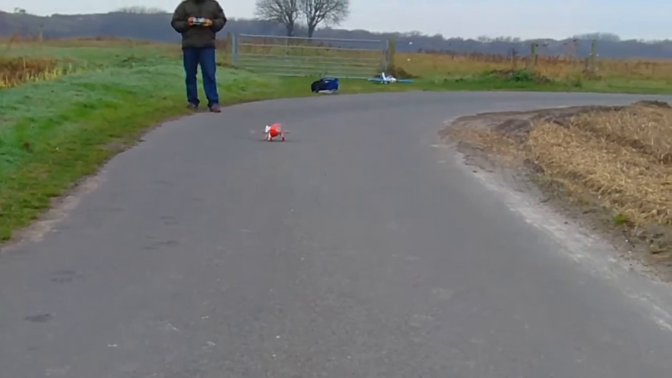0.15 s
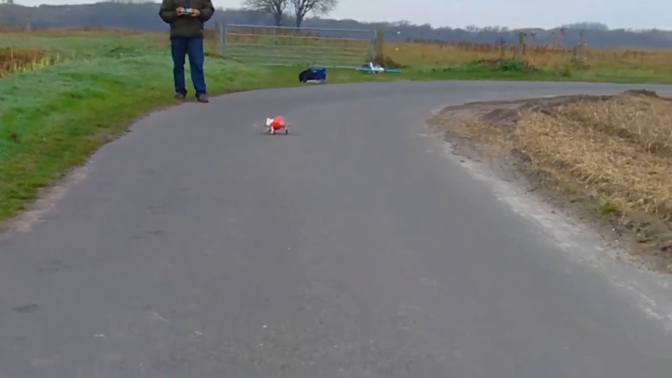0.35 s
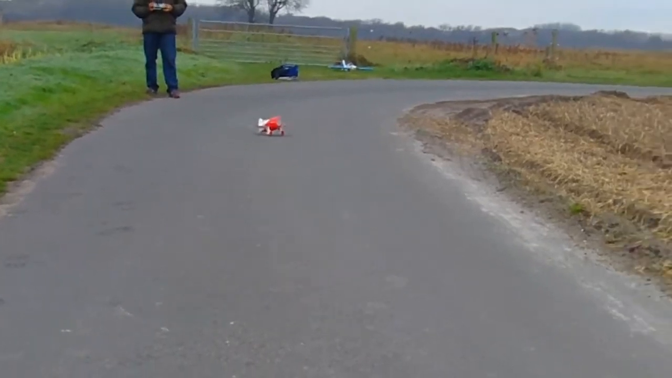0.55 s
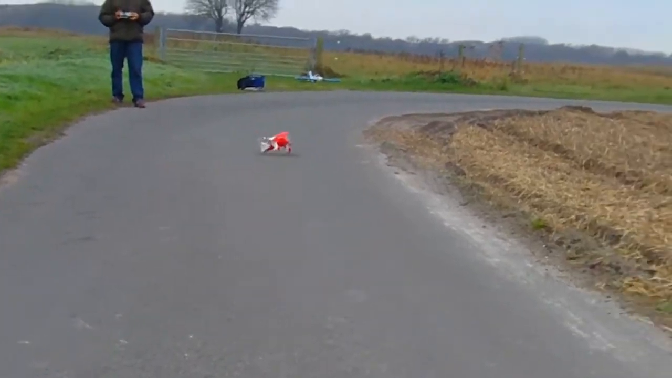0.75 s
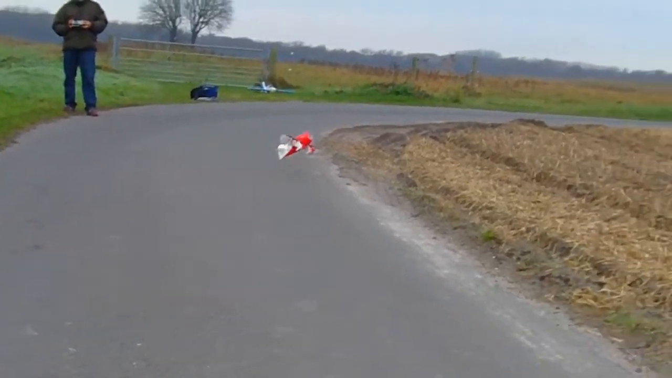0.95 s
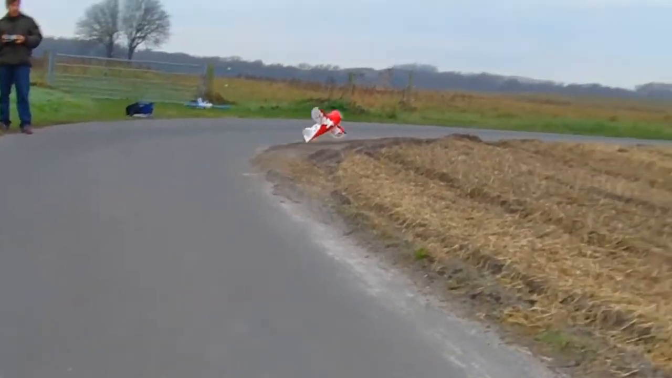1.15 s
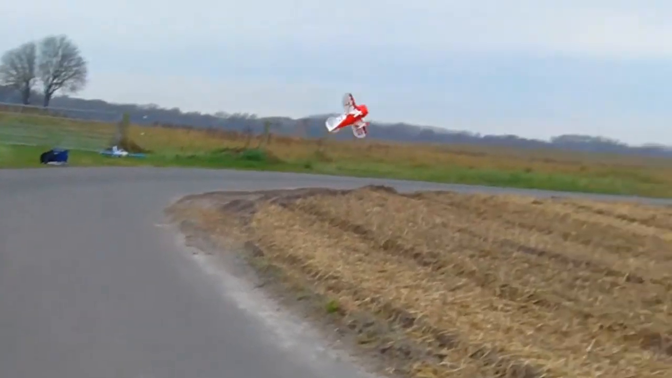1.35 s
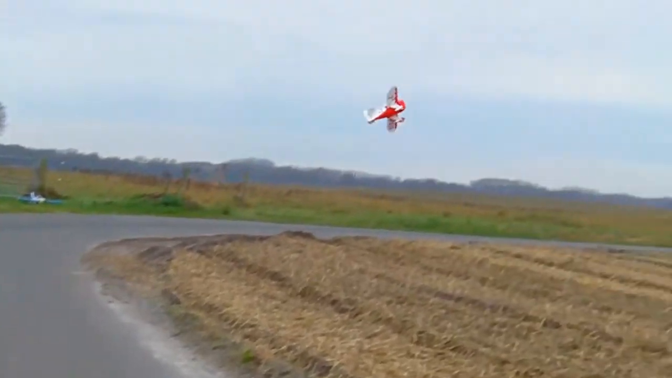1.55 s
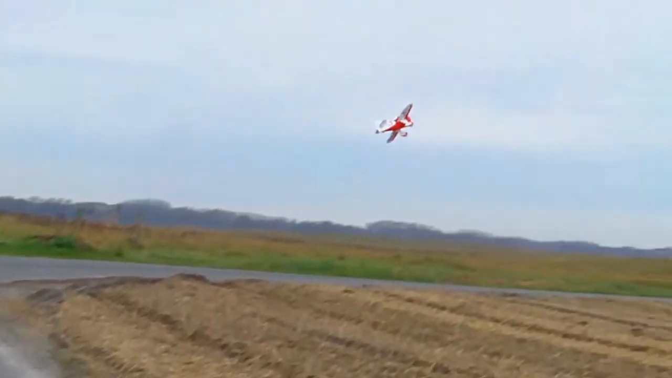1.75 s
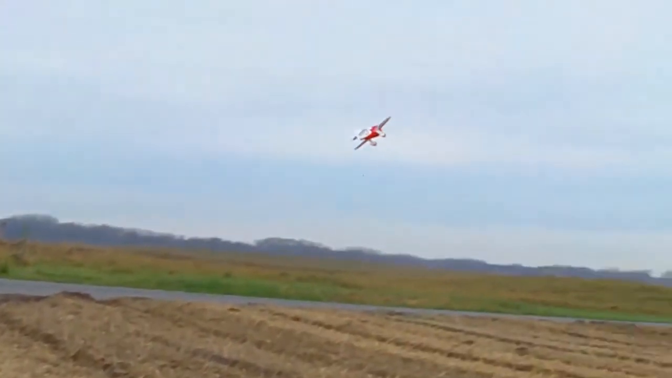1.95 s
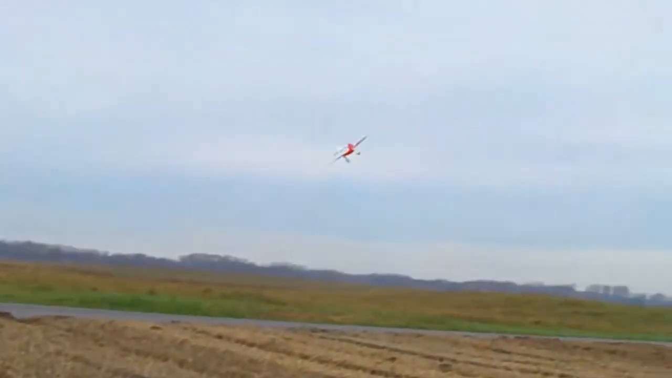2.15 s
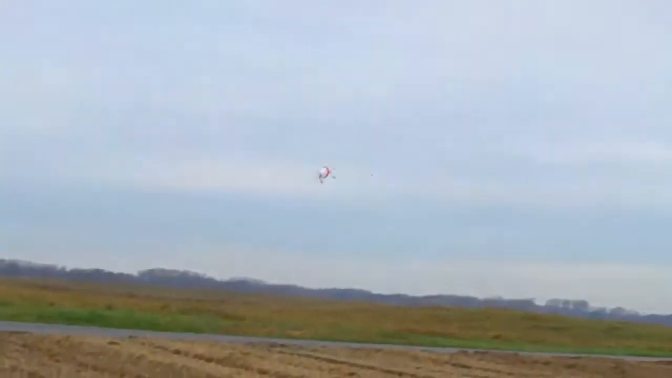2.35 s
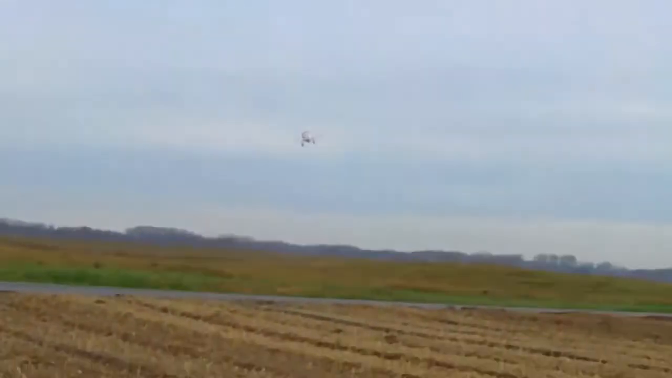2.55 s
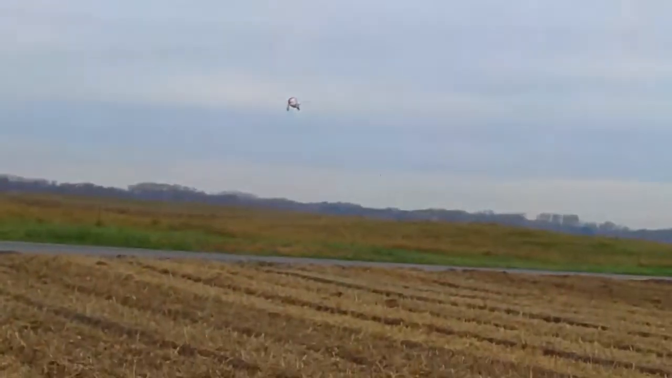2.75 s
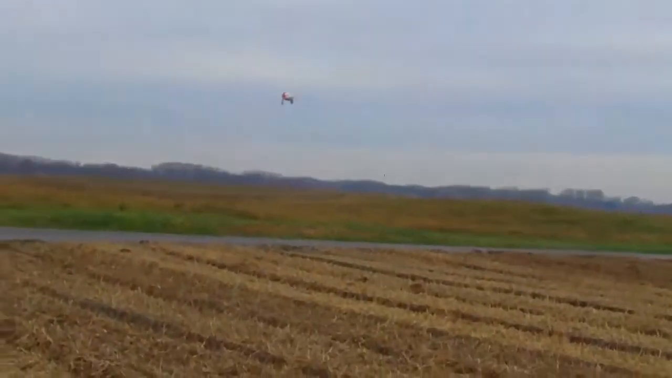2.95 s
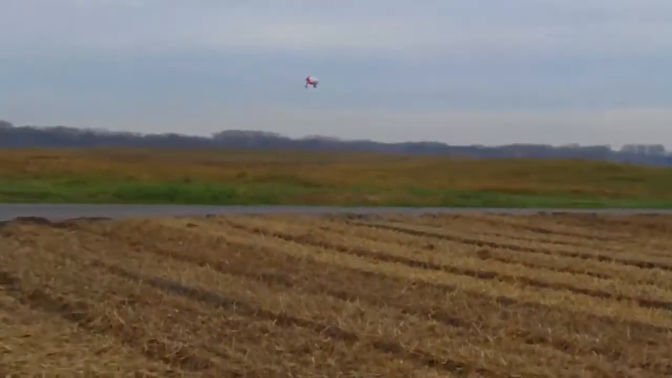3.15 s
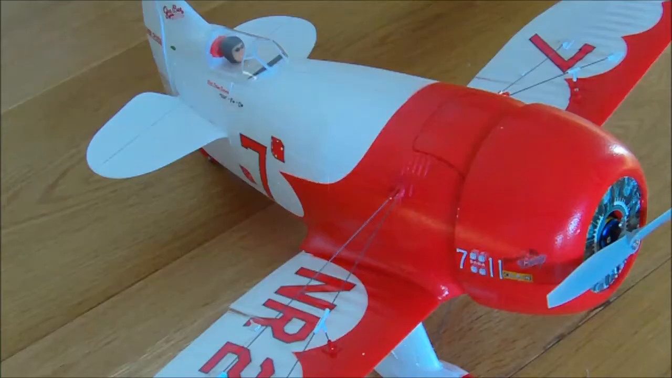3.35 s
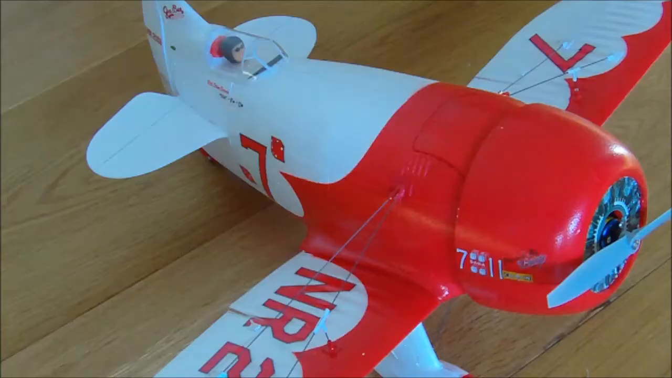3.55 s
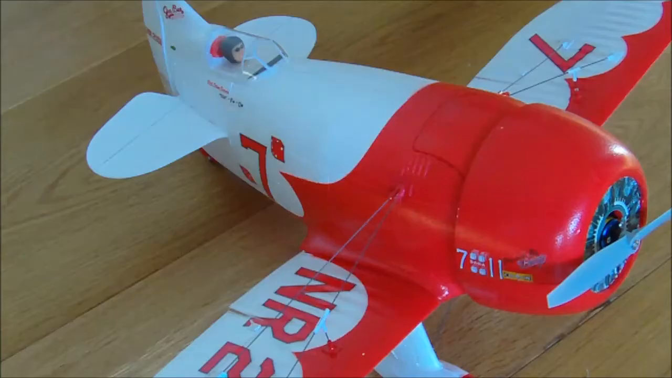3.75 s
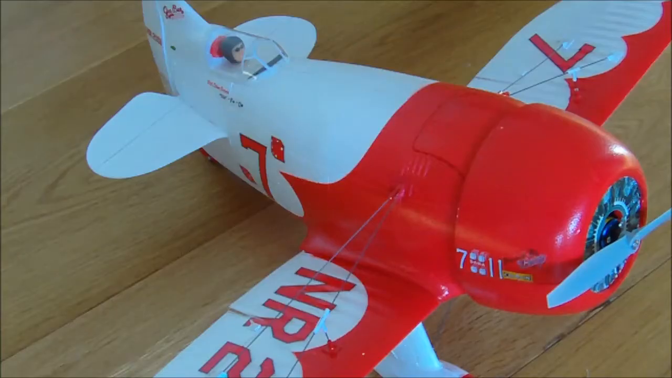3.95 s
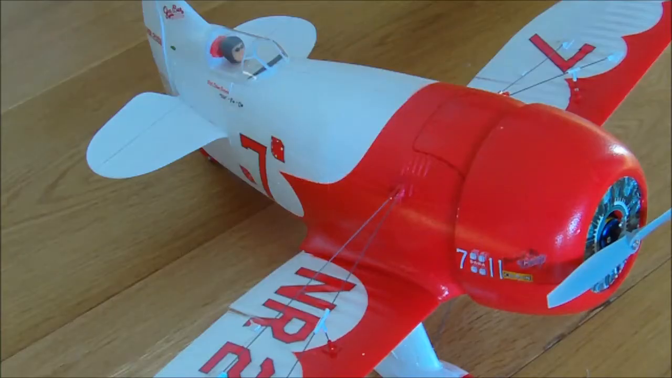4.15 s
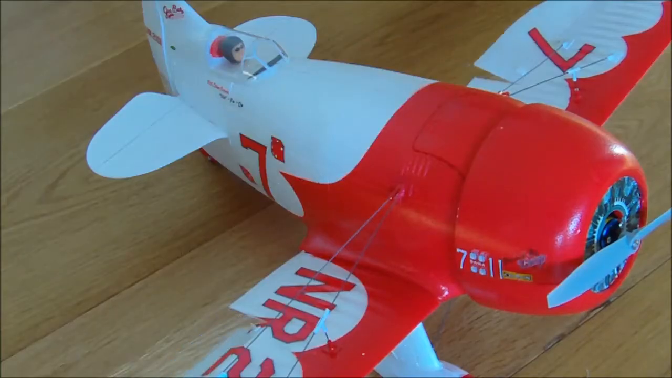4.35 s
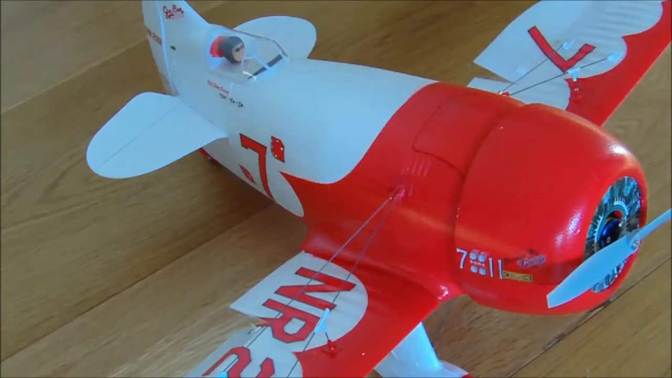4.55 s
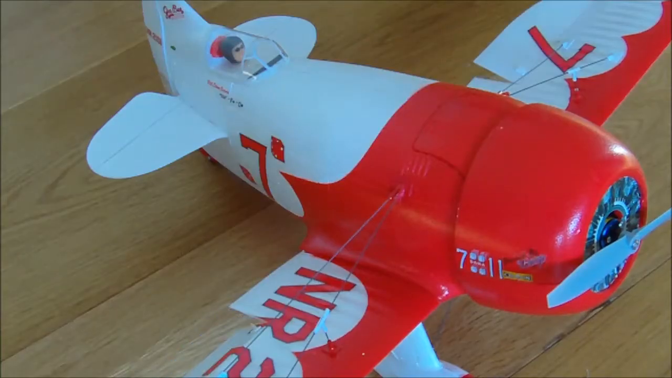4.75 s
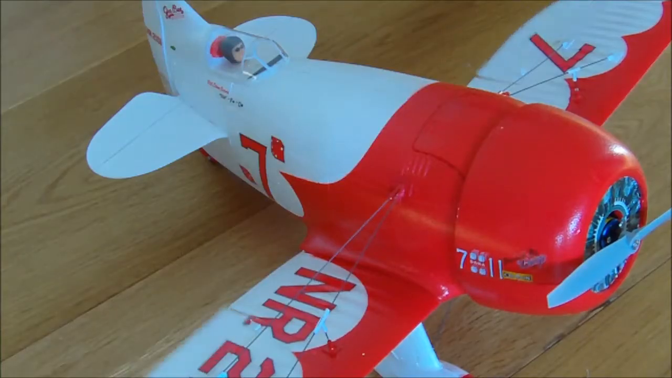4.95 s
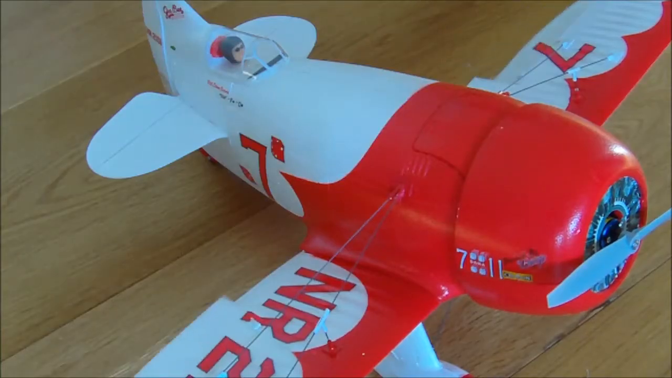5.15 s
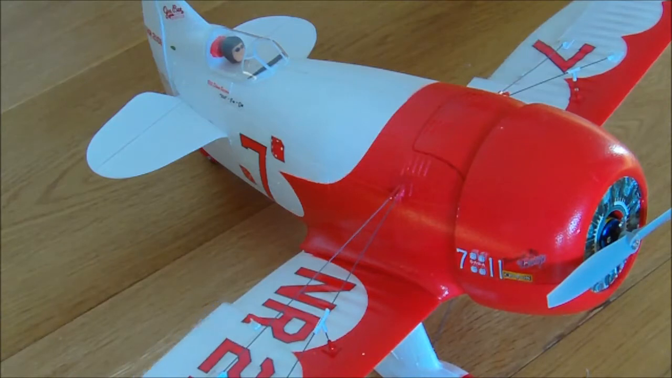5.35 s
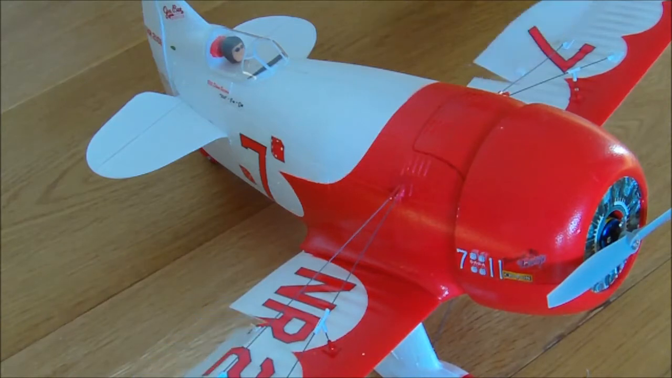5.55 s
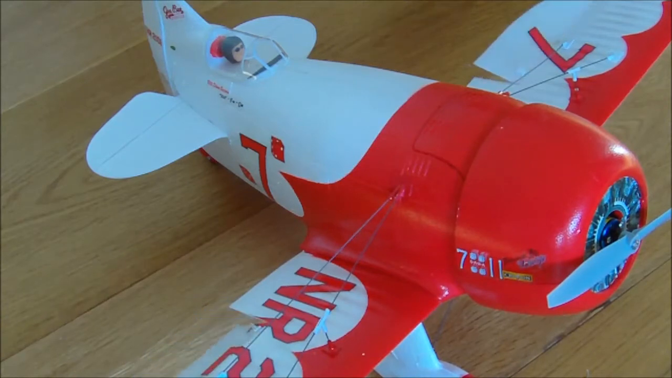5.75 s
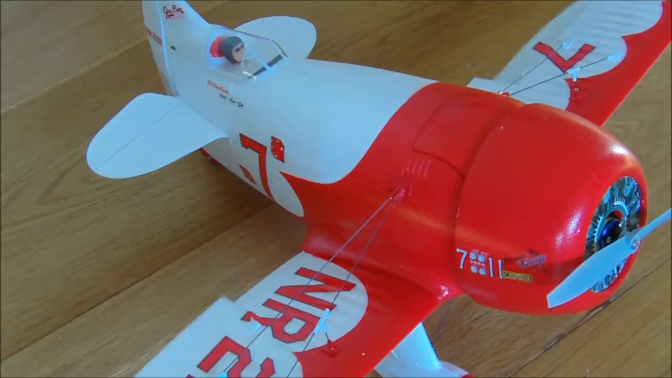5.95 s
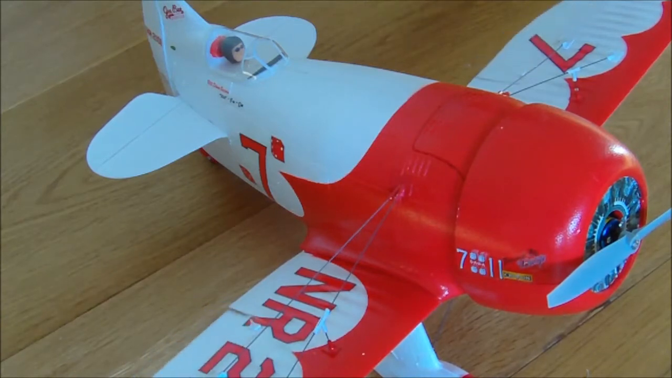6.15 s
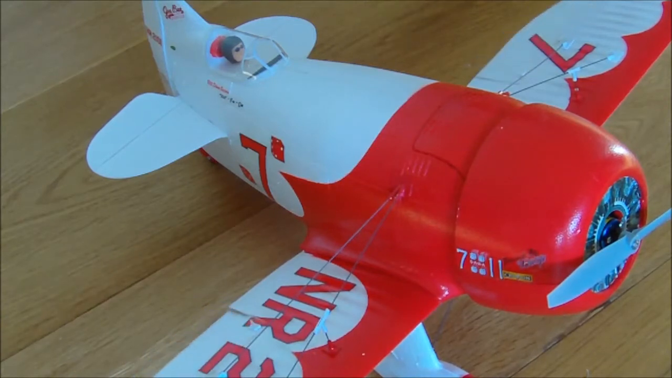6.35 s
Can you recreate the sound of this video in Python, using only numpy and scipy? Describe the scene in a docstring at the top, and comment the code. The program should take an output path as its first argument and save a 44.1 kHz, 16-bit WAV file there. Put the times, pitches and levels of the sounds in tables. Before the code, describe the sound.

On an open field road, a tiny electric model plane revs quickly from a low buzz to a bright whine with rushing propeller air, passes close, drops in pitch and recedes. Soft handling taps and one hard click come near the microphone. A sudden cut leads to a quiet room, where two little servos move the ailerons in short, rasping, gritty whirrs with small squeaks and light room echo.

```python
"""On a field road a tiny electric model plane takes off, passes close by and climbs away; then a quiet room.
Outdoors, tones at multiples of the shaft rate whine over propeller turbulence and its echo from the road,
with steady field noise, a few soft handling taps and one hard click.
After a cut, two small geared servos swing the ailerons in short rasping whirrs: tooth-mesh noise
drives the resonances of frame, wing and fuselage, and the room adds its diffuse reflections."""
import sys
import numpy as np
from scipy import signal
from scipy.fft import rfft, irfft, next_fast_len
from scipy.io import wavfile

SR = 44100
rng = np.random.default_rng(int(sys.argv[2]) if len(sys.argv) > 2 else 0)


def dump_mix(stems):
    """Bounce the given channels to the path in sys.argv[1] as a 16-bit WAV at rate SR."""
    frames = np.atleast_2d(stems).T  # one column per channel
    limited = np.clip(frames, -1, 1)  # hard clip at full scale
    pcm = np.round(limited * 32767).astype(np.int16)
    wavfile.write(sys.argv[1], SR, pcm)


N = 281799
TIME = np.arange(N) / SR


def from_db(db):
    """Logarithmic level: decibels to an amplitude ratio."""
    return np.exp(np.asarray(db) * np.log(10) / 20)


def rms_one(x):
    """Normalisation by mean power: scale to rms 1."""
    return x / np.sqrt(np.mean(x ** 2) + 1e-20)


def in_time(rows):
    """Linear interpolation: each column of a time table, sample by sample."""
    s, *columns = np.transpose(rows)
    return [np.interp(TIME, s, c) for c in columns]


def at_hz(points, hz):
    """Logarithmic interpolation: read a table on a log-frequency axis."""
    f, value = np.transpose(points)
    return np.interp(np.log(hz + 1), np.log(f), value)


def ease(middle_s, spread_s):
    """Sigmoid transition: a smooth step from 0 to 1."""
    return .5 + .5 * np.tanh((TIME - middle_s) / (2 * spread_s))


def drift(rate):
    """Random modulation: interpolated chance values, `rate` knots a second, rms 1."""
    knots = rng.standard_normal(N // 32)
    return rms_one(np.interp(TIME * rate, np.arange(len(knots)), knots))


def butter(x, hz, kind, order=2):
    """Maximally flat filtering: a Butterworth filter."""
    sections = signal.butter(order, np.clip(hz, 10, .45 * SR), kind, fs=SR, output="sos")
    return signal.sosfilt(sections, x + 1e-18)


def shaped(x, gain_at):
    """Spectral weighting: multiply the spectrum by a gain that depends on frequency."""
    size = next_fast_len(N)
    spectrum = rfft(x, size) * gain_at(np.fft.rfftfreq(size, 1 / SR))
    return irfft(spectrum, size)[..., :N]


def coloured(x, spectrum):
    """Spectral colour: weight by a table that falls away below its lowest point; rms 1."""
    def gain_at(hz):
        return from_db(at_hz(spectrum, hz)) * np.minimum(hz / spectrum[0][0], 1) ** 2
    return rms_one(shaped(x, gain_at))


def stereo(pair, width):
    """Mid-side stereophony: two unrelated sounds become sum and difference of the channels."""
    side = shaped(pair[1], lambda hz: from_db(at_hz(width, hz)))
    return pair[0] + side * np.array([[1], [-1]])


def noise(spectrum, width):
    """Stationary random noise: coloured Gaussian noise in stereo."""
    return stereo(coloured(rng.standard_normal((2, N)), spectrum), width)


def resonance(x, hz, width_hz):
    """Damped single mode: a two-pole resonance with gain 1 at its peak."""
    r = np.exp(-np.pi * width_hz / SR)
    zeros = np.array([1, 0, -1]) * (1 - r * r) / 2
    poles = [1, -2 * r * np.cos(2 * np.pi * hz / SR), r * r]
    return signal.lfilter(zeros, poles, x)


def shaft_angle(hz, jitter, jitter_rate):
    """Phase as the integral of frequency: the angle of a shaft whose speed wavers."""
    return 2 * np.pi * np.cumsum(hz * (1 + jitter * drift(jitter_rate))) / SR


def partial(angle, flutter_db, flutter_rate, smear):
    """Amplitude and phase modulation: a tone whose level and phase flutter at random."""
    phase = (angle + smear * drift(70) + rng.uniform(0, 2 * np.pi)).astype(np.float32)
    return np.sqrt(2) * from_db(flutter_db * drift(flutter_rate)) * np.sin(phase)


def bursts(rows, rise_s):
    """Transient envelope: short bursts, each with a quick rise and a longer fall."""
    total = 0
    for s, db in rows:
        age = np.clip((TIME - s) / rise_s + .5, 0, 50)
        total = total + from_db(db) * age * np.exp(1 - age)
    return total


# motor speed: (time [s], shaft speed [turns/s])
SHAFT = [(0.0, 89), (0.08, 94.5), (0.31, 122), (0.48, 138.4), (0.63, 171), (0.72, 183), (0.83, 187.4),
         (1.34, 180.6), (1.39, 182), (1.54, 157), (1.75, 135.3), (1.98, 123.8), (2.18, 118.1), (2.64, 116),
         (2.91, 110.5), (3.14, 109), (3.23, 109), (3.37, 120.8)]
FULL_THROTTLE_S, THROTTLE_BACK_S, THROTTLE_SPREAD_S = .625, 1.582, 0.011


def propeller_shaft():
    """Rotational kinematics: angle, speed and throttle (0 to 1, fully open) of the shaft."""
    turns, = in_time(SHAFT)
    throttle = ease(FULL_THROTTLE_S, THROTTLE_SPREAD_S) - ease(THROTTLE_BACK_S, THROTTLE_SPREAD_S)
    return shaft_angle(turns, jitter=0.002, jitter_rate=40), turns, throttle


# the plane rolls up, passes and climbs away: (time [s], distance [m])
DISTANCE = [(0, 6.75), (.55, 4.87), (.95, 4.73), (1.15, 3.4), (1.5, 2.86), (1.7, 4.8), (2.0, 6.7),
            (2.5, 15.9), (3.37, 13.8)]
FULL_TURNS_HZ, NEAR_M = 187.5, 3.01
PASSING_S = 1.06   # from here the plane turns its tail to the listener


def flight_db(law, turns, throttle):
    """Spherical spreading and source power: level from distance, shaft speed, throttle and heading."""
    near_db, octave_db, throttle_db, aft_db_per_s = law
    metres, = in_time(DISTANCE)
    power_db = octave_db * np.log2(turns / FULL_TURNS_HZ) + throttle_db * throttle
    spreading_db = -20 * np.log10(metres / NEAR_M)
    return near_db + power_db + spreading_db - aft_db_per_s * np.maximum(TIME - PASSING_S, 0)


# propeller tones: (frequency [multiples of the shaft rate])
BLADE_ORDERS = [1, 2, 3, 4, 5, 6, 7, 9, 11, 12, 13]
# strength of each propeller tone: (relative level [dB])
BLADE_DB = [-16.5, -4, 4, -1, 6, -13, -37, 3, -13, -3, 0]
# growth of the blade tones: (level at full speed and near [dB], per octave of shaft speed [dB],
# extra at full throttle [dB], loss once past [dB/s])
BLADE_LAW = (-60.5, 12, 12, 17)


def blade_tones(angle, turns, throttle):
    """Rotational noise: the turning propeller radiates tones at multiples of the shaft rate."""
    blades = sum(from_db(db) * partial(k * angle, flutter_db=-1.5, flutter_rate=14, smear=0.17)
                 for k, db in zip(BLADE_ORDERS, BLADE_DB))
    return from_db(flight_db(BLADE_LAW, turns, throttle)) * blades


# three strong magnet tones: (frequency [multiples of the shaft rate])
MAGNET_ORDERS = [8, 10, 20]
# level of each of them in turn: (time [s], level [dB])
EIGHTH_ORDER = [(.24, -62), (.32, -43.5), (.6, -40), (.7, -45), (1.25, -60), (1.38, -38), (1.55, -47.5),
                (1.75, -39), (1.9, -41), (2.02, -47), (2.25, -56.5), (3.37, -57)]
TENTH_ORDER = [(0, -58), (.1, -43), (.23, -54.5), (.46, -35.5), (.53, -42), (.58, -34.5), (0.648, -32),
               (0.779, -41), (.97, -38.5), (1.09, -52), (1.3, -44), (1.55, -41.5), (1.75, -44.5),
               (2.0, -63), (3.37, -57)]
TWENTIETH_ORDER = [(0, -68), (.3, -56), (.58, -57), (.64, -43), (.75, -44), (.85, -57), (1.15, -53),
                   (1.3, -47), (1.42, -53), (1.55, -48), (1.75, -48), (2.1, -61.5), (3.37, -61)]


def magnet_tones(angle):
    """Magnetic force harmonics: three strong orders locked to the shaft."""
    total = 0
    for k, rows in zip(MAGNET_ORDERS, (EIGHTH_ORDER, TENTH_ORDER, TWENTIETH_ORDER)):
        level_db, = in_time(rows)
        total = total + from_db(level_db) * partial(k * angle, flutter_db=1.5, flutter_rate=40, smear=0.045)
    return total


# upper motor whine: (frequency [multiples of the shaft rate])
WHINE_ORDERS = [9, 11, 12, 16, 18, 19, 21, 22, 23, 27, 30, 38]
# strength of each whine tone: (relative level [dB])
WHINE_DB = [-6, -2.5, -2.5, -30, -6.5, -2.5, -6.5, -6, -6.5, -13, -8, -7]
# growth of the whine: (level at full speed and near [dB], per octave of shaft speed [dB],
# extra at full throttle [dB], loss once past [dB/s])
WHINE_LAW = (-50, 2.5, -1.5, -1)


def upper_whine(angle, turns, throttle):
    """Forced resonance: the cowl rings with whichever motor order glides through its mode."""
    whine = sum(from_db(db) * partial(k * angle, flutter_db=3.0, flutter_rate=14, smear=0.26)
                for k, db in zip(WHINE_ORDERS, WHINE_DB))
    cowl = resonance(whine, hz=2230, width_hz=220)
    return from_db(flight_db(WHINE_LAW, turns, throttle)) * from_db(-3) * (whine + cowl)


# sidebands of the speed controller: (offset from its switching tone [multiples of the shaft rate])
SIDEBAND_ORDERS = [-14, -12.5, -11, -10.5, -9, -2, 7.3, 8, 9]
# strength of each sideband before distance and throttle: (on the ground [dB], in the air [dB])
SIDEBANDS = [(-60, -63.5), (-61, -67), (-58, -96), (-76, -68), (-56.5, -73), (-85, -67), (-85, -68.5),
             (-81, -67), (-63, -80)]
SWITCHING_HZ = 8000
CLIMB_MIDDLE_S, CLIMB_SPREAD_S = 1.307, 0.18


def switching_sidebands(angle, throttle, fuzz=0.13, dip_db=-10, falloff=.4, reference_m=8):
    """Carrier modulation: shaft rotation sets sidebands about the switching tone, weaker at full throttle."""
    airborne = ease(CLIMB_MIDDLE_S, CLIMB_SPREAD_S)
    carrier = 2 * np.pi * SWITCHING_HZ * TIME
    total = 0
    for k, (ground_db, air_db) in zip(SIDEBAND_ORDERS, SIDEBANDS):
        tone = partial(carrier + k * angle, flutter_db=2.0, flutter_rate=12, smear=.8)
        total = total + from_db(ground_db + airborne * (air_db - ground_db)) * tone
    metres, = in_time(DISTANCE)
    spreading = (reference_m / metres) ** falloff
    return total * spreading * from_db(dip_db * throttle) * (1 + fuzz * drift(350))


def motor(angle, turns, throttle):
    """Superposition: blade, magnet, whine and switching tones, all tied to one shaft."""
    tones = blade_tones(angle, turns, throttle) + magnet_tones(angle)
    return tones + upper_whine(angle, turns, throttle) + switching_sidebands(angle, throttle)


# turbulence spectrum: (frequency [Hz], relative density [dB per Hz])
RUSH = [(150, -48.5), (300, -24), (500, -0.5), (900, 2.5), (1600, 1.5), (2600, 2), (4000, -7), (6000, -14),
        (9000, -20), (11000, -26.5), (15000, -33.5)]
# stereo width of the flight: (frequency [Hz], side minus mid [dB])
FLIGHT_WIDTH = [(60, -38), (150, -21), (380, -66), (950, -74), (2380, -28.5), (5980, -10), (15000, -14)]
# growth of the low, middle and high rush: (level at full speed and near [dB],
# per octave of shaft speed [dB], extra at full throttle [dB], loss once past [dB/s])
LOW_RUSH_LAW = (-48, 7, 6.5, 6)
MID_RUSH_LAW = (-39.5, 3.5, 6.5, 4.5)
HISS_LAW = (-43, 4.5, 0.6, 0.5)
ECHO_LAG_S = 0.001108   # lag of the road's echo once the plane has lifted


def propeller_air(angle, turns, throttle, chop=0.2, road_share=0.72, road_cut_hz=4600,
                  lowest_hz=240, low_hz=1000, high_hz=5500):
    """Comb filtering: two blades chop turbulence; its dull road echo sweeps notches down as the plane lifts."""
    air = noise(RUSH, FLIGHT_WIDTH) * (1 + chop * np.cos(2 * angle)) * from_db(1.3 * drift(120))
    lag_s = ECHO_LAG_S * ease(CLIMB_MIDDLE_S, CLIMB_SPREAD_S)
    echo = shaped(air, lambda hz: road_share / (1 + (hz / road_cut_hz) ** 4))
    air = air + np.array([np.interp(TIME - lag_s, TIME, channel) for channel in echo])
    low = rms_one(butter(air, [lowest_hz, low_hz], "band", order=4))
    mid = rms_one(butter(air, [low_hz, high_hz], "band", order=3))
    hiss = rms_one(butter(air, high_hz, "high", order=4))
    laws = LOW_RUSH_LAW, MID_RUSH_LAW, HISS_LAW
    return sum(from_db(flight_db(law, turns, throttle)) * band for law, band in zip(laws, (low, mid, hiss)))


# field noise spectrum: (frequency [Hz], relative density [dB per Hz])
FIELD = [(18, -55), (30, -14.5), (150, -13), (374, -10.5), (928, 1), (1690, -8), (2310, -6), (2770, -14.5),
         (3150, -6), (3590, -17.5), (8690, -18), (15000, -57)]
# stereo width outdoors: (frequency [Hz], side minus mid [dB])
FIELD_WIDTH = [(60, -11), (150, -19), (380, -14), (950, -14.5), (2380, -8), (5980, -5.5), (15000, 8)]


def field_air(level_db=-53):
    """Stationary ambient noise: the open field."""
    return from_db(level_db) * noise(FIELD, FIELD_WIDTH)


# soft handling taps: (time [s], level [dB])
TAPS = [(0.385, -37), (1.902, -37.5), (3.127, -41), (3.144, -44)]
# spectrum of the taps: (frequency [Hz], relative density [dB per Hz])
TAP_COLOUR = [(300, -14), (800, -8), (1350, 9), (2200, -14), (5000, -8), (14000, -36)]
# modes of a small hard shell: (frequency [Hz], relative level [dB], 60 dB decay time [s])
SHELL = [(2514, -10.5, 0.013), (4220, -2, 0.0045), (4900, -7, 0.0086), (5900, -11, 0.013),
         (7600, -10.5, 0.0048), (9300, -11, 0.0027), (12500, -17, 0.0087), (14200, -12, .003)]
CLICK_S, CLICK_DB = 3.2147, -14


def handling_knocks():
    """Impulse response: soft noise taps, and one hard click that rings the modes of a small shell."""
    click = from_db(CLICK_DB) * (np.arange(N) == round(CLICK_S * SR)) + 1e-18
    out = bursts(TAPS, rise_s=0.0017) * noise(TAP_COLOUR, FIELD_WIDTH)
    for k, (hz, db, t60) in enumerate(SHELL):
        r, w = from_db(-60 / (t60 * SR)), 2 * np.pi * hz / SR
        ring = signal.lfilter([0, np.sin(w)], [1, -2 * r * np.cos(w), r * r], click)
        out += (-1) ** k * from_db(db) * ring
    return out


# room tone spectrum: (frequency [Hz], relative density [dB per Hz])
ROOM_TONE = [(24, -74), (40, -26), (164, -29), (270, -3.5), (306, -9), (527, -3), (710, -5.5), (824, -5),
             (1570, -11), (1870, -11), (2010, -14.5), (8070, -44), (15000, -28.5)]
# stereo width of the room tone: (frequency [Hz], side minus mid [dB])
ROOM_TONE_WIDTH = [(60, -13), (150, -19), (380, -18), (950, -12), (2380, -4), (5980, 4), (15000, -2)]


def room_tone(level_db=-57.5):
    """Stationary background noise: the quiet room."""
    return from_db(level_db) * noise(ROOM_TONE, ROOM_TONE_WIDTH)


# a servo holds the raised aileron: (time [s], level [dB])
HOLD = [(4.4, -68), (4.55, -57.5), (4.78, -57), (4.83, -53), (5.0, -68)]
# tones of the holding servo: (frequency [Hz], relative level [dB])
HOLD_TONES = [(620, -2), (1150, 0), (2780, -12), (4140, -12)]
# spectrum of the gear noise: (frequency [Hz], relative density [dB per Hz])
GEAR_COLOUR = [(150, -79), (300, -31), (600, 1.5), (1200, -2), (2300, 6), (5000, 0), (7000, -3),
               (9200, -5.5), (10500, -7), (14500, -19.5)]
# stereo width of echoes and of the holding servo: (frequency [Hz], side minus mid [dB])
ECHO_WIDTH = [(60, -9), (180, -22), (550, -22.5), (1650, -11), (4970, -0.5), (15000, 2)]


def holding_buzz(gear_db=-2):
    """Dither about equilibrium: a holding servo buzzes in fluttering tones and gear noise."""
    tones = rms_one(sum(from_db(db) * partial(2 * np.pi * hz * TIME, flutter_db=3.5, flutter_rate=51, smear=1.0)
                        for hz, db in HOLD_TONES))
    level_db, = in_time(HOLD)
    return from_db(level_db) * (tones + from_db(gear_db) * noise(GEAR_COLOUR, ECHO_WIDTH))


# reverberation: (frequency [Hz], 60 dB decay time [s])
ROOM_T60 = [(300, 0.32), (1100, 0.9), (3000, 0.66), (8000, 0.56), (14000, 0.3)]


def room(x, first_echo_s=0.0034):
    """Diffuse reverberation: convolve with noise that dies exponentially band by band."""
    t, tail = TIME[:SR], 0
    edges = np.geomspace(150, 16000, 8)
    for low, high in zip(edges, edges[1:]):
        band = butter(rng.standard_normal((2, SR)), [low, high], "band")
        tail = tail + band * from_db(-60 * t / at_hz(ROOM_T60, np.sqrt(low * high)))
    tail = rms_one(tail * (t > first_echo_s)) / np.sqrt(SR)
    echoes = signal.fftconvolve(x.mean(axis=0)[None], tail, axes=1)[:, :N]
    return stereo(echoes, ECHO_WIDTH)


def gate(start_s, stop_s, attack_s=0.0056, release_s=0.0069):
    """Attack and exponential decay: a quick rise, a hold and a dying release."""
    return np.clip((TIME - start_s) / attack_s, 0, 1) * np.exp(-np.maximum(TIME - stop_s, 0) / release_s)


# aileron moves: (start [s], free running from [s], stop [s], pitch reached after spin-up [Hz],
# end pitch [Hz], second servo's share of that speed [ratio],
# relative levels of whirr, creeping rasp, running rasp [dB])
MOVES = [(4.151, 4.18, 4.195, 720.8, 721.8, .9, -54, -36.5, -42),
         (4.194, 4.241, 4.34, 821.5, 709.3, 0.95, -28.5, -28.5, -25.5),
         (4.827, 4.852, 4.998, 1134, 1100, 0.95, -21.5, -24, -29.5),
         (5.228, 5.326, 5.493, 1076, 730.5, 0.88, -22.5, -31, -26.5),
         (5.683, 5.765, 5.922, 1017, 1066, .83, -23, -27.5, -29.5),
         (6.005, 6.028, 6.128, 897.7, 981.6, .86, -29.5, -30.5, -29),
         (6.348, 6.37, 6.382, 746, 750, 0.89, -50, -31.5, -31.5)]
CREEP_HZ, BREAKAWAY_HZ, SPIN_UP_HZ_PER_S = 482.5, 700.3, 6000
COMMAND_PERIOD_S, CREEP_PULSE_DB = 0.024, 7   # a creeping servo gets one kick of current per command
WHIRR_DB_PER_OCTAVE = 16   # the whirr grows with speed
LOAD_DB_PER_OCTAVE = 4.5   # the rasp grows as load drags the speed down


def servo_moves():
    """Drive against friction and load: creep in kicks, break free, spin up, run; pitches and two gains."""
    pitches, whirr, rasp = np.full((2, N), float(CREEP_HZ)), 0, 0
    for start, free, stop, spun_up_hz, end_hz, share, whirr_db, creep_db, rasp_db in MOVES:
        at_speed = free + max(spun_up_hz - BREAKAWAY_HZ, 1) / SPIN_UP_HZ_PER_S
        hz = np.interp(TIME, [start, free, at_speed, stop], [CREEP_HZ, BREAKAWAY_HZ, spun_up_hz, end_hz])
        pitches = np.where(TIME >= start, [hz, share * hz], pitches)
        octaves = np.log2(hz / spun_up_hz)
        kicks_db = -CREEP_PULSE_DB * ((TIME - start) / COMMAND_PERIOD_S % 1)
        running = np.clip((TIME - free) / (at_speed - free), 0, 1)
        whirr = whirr + gate(free, stop) * from_db(whirr_db + WHIRR_DB_PER_OCTAVE * octaves)
        creeping_level = (1 - running) * (creep_db + kicks_db)
        running_level = running * (rasp_db - LOAD_DB_PER_OCTAVE * octaves)
        rasp = rasp + gate(start, stop) * from_db(creeping_level + running_level)
    return pitches, whirr, rasp


# servo frame and foam wing: (frequency [Hz], width [Hz], relative level [dB])
WING = [(1562, 34, -4), (2232, 430, 1), (2736, 140, 1), (3164, 160, 4), (4100, 50, -4), (4646, 92, 2.5),
        (4820, 120, -11.5), (5880, 180, -9), (6230, 370, -12), (7570, 59, 1.5), (8430, 117, -2),
        (8940, 200, 1.5)]
# stereo width of the servos: (frequency [Hz], side minus mid [dB])
SERVO_WIDTH = [(60, -13), (150, -17), (380, -39), (950, -56), (2380, -14.5), (5980, -11.5), (15000, -3.5)]
TOOTH_SHARPNESS = 2.0   # how briefly each tooth presses
WOBBLE_TEETH = 4   # tooth cycles for each swell of the rasp


def gear_rasp(angles, grain_db=-0.5, plain_db=-11, lowest_hz=380, wobble=0.14):
    """Contact noise exciting modes: teeth scrape once a cycle and shake frame and wing, whose modes fluctuate."""
    contact = sum(np.exp(TOOTH_SHARPNESS * np.cos(a)) for a in angles) * from_db(grain_db * drift(500))
    contact = contact * (1 + wobble * np.cos(angles[0] / WOBBLE_TEETH))   # flutters in step with the gears
    scrape = contact * rng.standard_normal((2, N))
    rings = sum((-1) ** k * from_db(db + 2.5 * drift(45)) * resonance(scrape, hz, width)
                for k, (hz, width, db) in enumerate(WING))
    rasp = from_db(-13) * rms_one(rings) + from_db(plain_db) * coloured(scrape, GEAR_COLOUR)
    return stereo(rms_one(butter(rasp, lowest_hz, "high", order=3)), SERVO_WIDTH)


def tooth_mesh(angles):
    """Harmonic excitation: mesh overtones flare up as they glide through the wing's resonances."""
    overtones = sum(np.sin(k * a) for a in angles for k in range(2, 10))
    return rms_one(sum(from_db(db) * resonance(overtones, hz, width) for hz, width, db in WING))


# jerks of the gear train as it takes up slack: (time [s], relative peak [dB])
JERKS = [(4.157, -21), (4.204, -17), (5.235, -18), (5.5115, -27), (5.5814, -26), (5.663, -18),
         (5.6879, -17), (5.9114, -31), (6.1958, -19)]


def gear_jerks(lowest_hz=1800):
    """Impact noise: the gear train takes up its slack in short bursts."""
    return bursts(JERKS, rise_s=0.0026) * butter(noise(GEAR_COLOUR, SERVO_WIDTH), lowest_hz, "high")


# hollow fuselage: (frequency [Hz], width [Hz], relative level [dB])
FUSELAGE = [(610, 73, -8), (782, 60, 2.5), (960, 27, -8.5), (1042, 69, -6.5), (1105, 19, -2)]


def servo_whirr(angles, rattle_db=-6, throb_db=4.5):
    """Cavity resonance: the two motors' uneven tones set the hollow fuselage rattling."""
    tones = rms_one(sum(from_db(db + throb_db * drift(130)) * np.sin(a) for a, db in zip(angles, (0, -3))))
    rattle = tones * drift(450)
    hollow = rms_one(sum(from_db(db) * resonance(rattle, hz, width) for hz, width, db in FUSELAGE))
    return rms_one(tones + from_db(rattle_db) * hollow)


def servos(body_db=-3.0, mesh_db=-3, treble_db=-5, jerk_db=-14.0, split_hz=5500):
    """Superposition of gear sources: whirr, rasp, mesh tones and jerks of two servos."""
    pitches, whirr_gain, rasp_gain = servo_moves()
    angles = [shaft_angle(hz, jitter, jitter_rate=250) for hz, jitter in zip(pitches, (.009, .03))]
    rasp = gear_rasp(angles) * from_db(2.2 * drift(130))
    body = rms_one(butter(rasp, split_hz, "low", order=4))
    treble = rms_one(butter(rasp, split_hz, "high", order=4))
    gears = from_db(body_db) * body + from_db(mesh_db) * tooth_mesh(angles) + from_db(treble_db) * treble
    whirr = whirr_gain * from_db(-2.0) * servo_whirr(angles)
    return whirr + rasp_gain * gears + from_db(jerk_db) * gear_jerks()


# squeaks of a binding gear: (time [s], level [dB], frequency [Hz])
SQUEAKS = [(4.271, -25, 2750), (4.29, -28, 3114), (4.338, -23.5, 3250), (5.476, -22.5, 2755),
           (5.483, -19.5, 4636), (5.509, -22.5, 2720), (5.511, -37, 4703), (5.911, -25, 3497)]


def squeaks(rise_s=0.0035):
    """Friction-driven resonance: a gear binds for a moment and drives one mode of the frame."""
    return sum(bursts([(s, db)], rise_s) * np.sin(2 * np.pi * hz * TIME + 1.1 * drift(400))
               for s, db, hz in SQUEAKS)


CUT_S, ROOM_START_S = 3.376, 3.39


def scene():
    """Succession of two sound fields: the flight over the field, then the servos indoors."""
    angle, turns, throttle = propeller_shaft()
    plane = motor(angle, turns, throttle) + propeller_air(angle, turns, throttle)
    outdoors = plane + field_air() + handling_knocks()
    ailerons = holding_buzz() + butter(servos(), 207, "high", order=3) + squeaks()
    indoors = ailerons + from_db(-10.0) * room(ailerons) + room_tone()
    return outdoors * (TIME < CUT_S) + indoors * (TIME > ROOM_START_S)


def record(dry):
    """Band limitation: the microphone passes no deep bass, and the top is cut steeply."""
    thin = butter(dry, 54, "high")
    steep_cut = signal.ellip(10, .1, 80, 15300, fs=SR, output="sos")   # ripple dB, stopband dB, Hz
    return signal.sosfilt(steep_cut, thin)


dry = scene()
out = record(dry)
dump_mix(out)
```